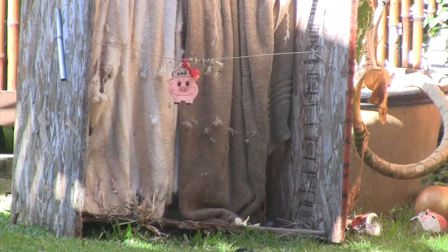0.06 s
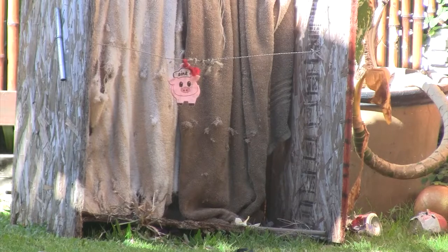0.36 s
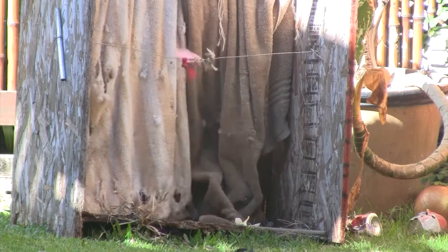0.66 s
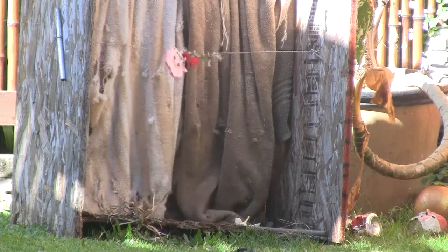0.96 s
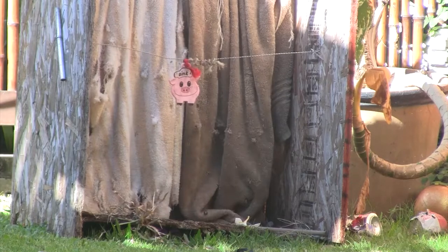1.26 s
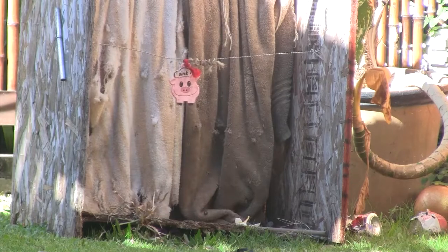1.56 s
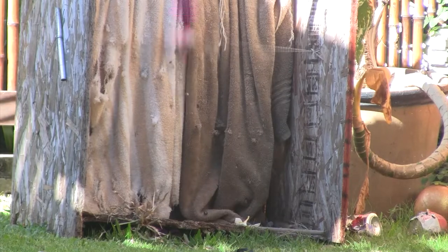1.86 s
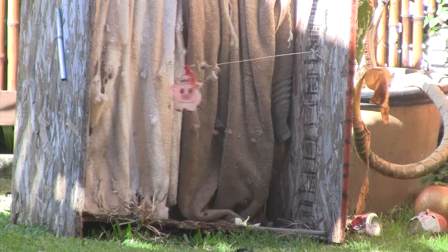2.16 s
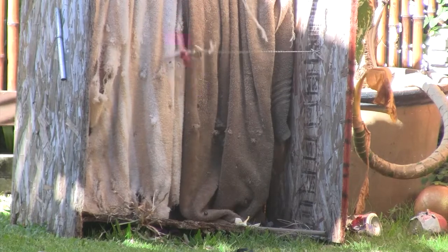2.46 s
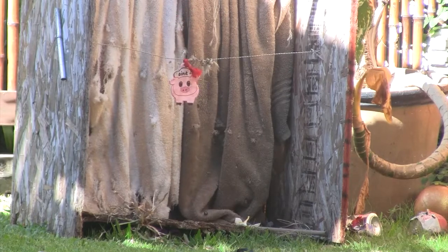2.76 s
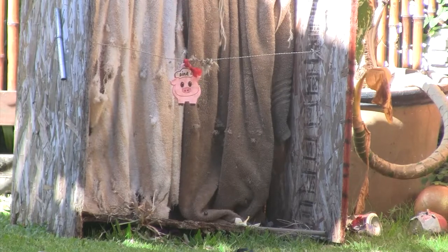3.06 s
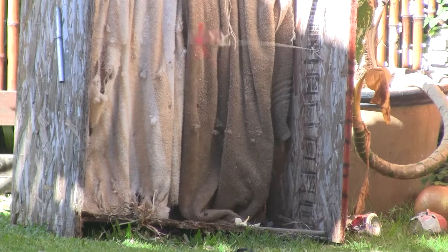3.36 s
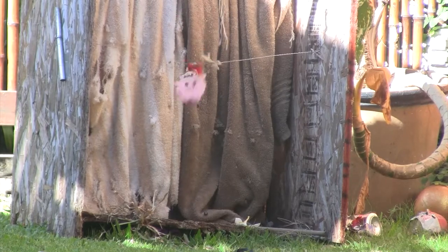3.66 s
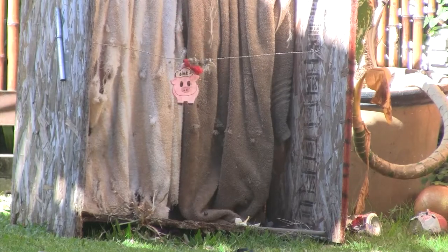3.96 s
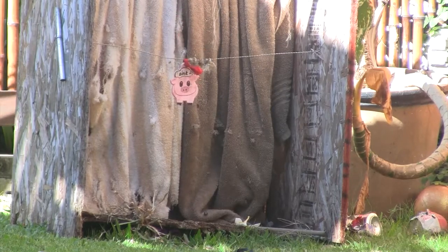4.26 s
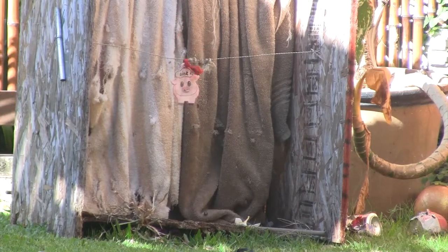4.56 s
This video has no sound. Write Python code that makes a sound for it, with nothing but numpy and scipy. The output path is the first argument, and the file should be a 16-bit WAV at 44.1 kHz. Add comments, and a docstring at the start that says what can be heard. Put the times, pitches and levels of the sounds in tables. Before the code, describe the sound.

Four close slingshot snaps and cracking target hits in a quiet yard, with dull thumps, wooden knocks and one metallic ping.

```python
"""Over outdoor air and a faint hum, slingshot bands snap twice, close by: four shots in a walled yard.
Each time, 0.19 s later, the ball cracks on a small hanging target and thumps into the cloth lining
of a wooden box. A stray ball rings on metal, others bounce on wood. A soft rustle comes between
the shots, and a far low drone swells once and fades."""
import sys
import numpy as np
from scipy import signal
from scipy.fft import rfft, irfft
from scipy.io import wavfile

SR = 44100
rng = np.random.default_rng(int(sys.argv[2]) if len(sys.argv) > 2 else 0)


def master_out(mix):
    """Clip the mix to full scale and print it as 16-bit PCM to the path in sys.argv[1]."""
    frames = np.transpose(np.atleast_2d(mix))
    ceiling = np.clip(frames, -1, 1)
    pcm = np.round(ceiling * 32767).astype(np.int16)
    wavfile.write(sys.argv[1], SR, pcm)


N = 212694
TIME = np.arange(N) / SR


def amp(db):
    return 10 ** (np.asarray(db) / 20)


def unit_rms(x):
    return x / np.sqrt(np.mean(x ** 2) + 1e-20)


def at_hz(table, hz):
    """Table value, interpolated over log frequency."""
    freqs, values = np.transpose(table)
    return np.interp(np.log(hz), np.log(freqs), values)


def click(s, db):
    """Impulse at time s."""
    return amp(db) * (np.arange(N) == round(s * SR))


def convolve(x, response):
    """Signal through a mono or stereo response."""
    return signal.oaconvolve(np.atleast_2d(x), np.atleast_2d(response))[:, :N]


def butter(x, order, hz, kind="low"):
    return signal.sosfilt(signal.butter(order, hz, kind, fs=SR, output="sos"), x + 1e-18)


def echoed(x, echoes, dull_hz=6000):
    """Signal plus early reflections, dulled by rough surfaces."""
    dull = butter(x, 1, dull_hz)
    return x + sum(amp(db) * np.interp(TIME - s, TIME, dull, left=0) for s, db in echoes)


def coloured(x, spectrum, size=2048):
    """Unit-energy minimum-phase filter: a click becomes the shortest pulse with this spectrum."""
    gain = amp(at_hz(spectrum, np.linspace(1, SR / 2, size // 2 + 1)))
    cepstrum = irfft(np.log(gain))
    causal_fold = np.r_[1, np.full(size // 2 - 1, 2), 1, np.zeros(size // 2 - 1)]
    pulse = irfft(np.exp(rfft(cepstrum * causal_fold)))
    return convolve(x, pulse / np.linalg.norm(pulse))[0]


def resonance(x, hz, width_hz):
    """Two-pole resonator, unity peak gain."""
    r = np.exp(-np.pi * width_hz / SR)
    feedback = [1, -2 * r * np.cos(2 * np.pi * hz / SR), r * r]
    return signal.lfilter(np.array([1, 0, -1]) * (1 - r * r) / 2, feedback, x + 1e-18)


def narrow_noise(hz, width_hz):
    """Wavering tone: noise twice through a resonator, 1 s run-in."""
    noise = rng.standard_normal(N + SR)
    return unit_rms(resonance(resonance(noise, hz, width_hz), hz, width_hz)[SR:])


def blow(s, db, hz, width_hz):
    """A few cycles around hz, with the energy of a click at that level."""
    pulse = resonance(resonance(click(s, 0), hz, width_hz), hz, width_hz)
    return amp(db) * pulse / np.linalg.norm(pulse)


# diffuse-field balance: f/Hz, left minus right/dB
BALANCE = [(120, 1), (200, 2), (400, -3), (700, -3), (1300, -1.5), (2400, -0.4), (15000, 0)]
def diffuse_noise(spectrum, width, t60=None, size=N):
    """Unit-rms stereo noise; level, width and optional decay per third octave."""
    edges_hz = np.geomspace(25, 17000, 29)
    white = rng.standard_normal((2, 2, size + SR // 4))
    ears = np.array([[1], [-1]])
    total = 0
    for k, (low, high) in enumerate(zip(edges_hz, edges_hz[1:])):
        mid, side = butter(white[k % 2], 2, [low, high], "band")[:, -size:]
        hz = np.sqrt(low * high)
        side_gain = amp(at_hz(width, hz))
        band = (mid + ears * side_gain * side) / np.hypot(1, side_gain)
        band *= amp(at_hz(spectrum, hz) + ears * at_hz(BALANCE, hz) / 2)
        if t60:
            band *= np.exp(-np.log(1000) * TIME[:size] / at_hz(t60, hz))
        total += band
    return unit_rms(total)


# yard tail decay: f/Hz, T60/s
TAIL_T60 = [(100, 0.58), (400, 0.4), (1200, 0.3532), (3000, 0.4167), (6000, 0.34), (10000, 0.32),
            (15000, 0.12)]
# tail spectrum: f/Hz, level/dB
TAIL_SPECTRUM = [(100, 0), (500, -1), (1500, 2.4), (3000, -3.6), (6000, -1), (10000, -0.1), (15000, -5)]
# tail width: f/Hz, side minus mid/dB
TAIL_WIDTH = [(110, -19), (200, -15), (400, -6.5), (2400, -13), (4400, -5), (8000, -0.5), (15000, 12)]
def yard(x, build_s=0.0012):
    """Fences and walls scatter sound into a short tail."""
    tail = diffuse_noise(TAIL_SPECTRUM, TAIL_WIDTH, TAIL_T60, size=SR // 2)
    tail *= 1 - np.exp(-TIME[:SR // 2] / build_s)
    return convolve(x, tail / np.sqrt(np.sum(tail ** 2) / 2))


# air spectrum: f/Hz, level/dB
AIR_SPECTRUM = [(15, -67), (25, -61), (53, -20.5), (92, -20), (108, -7), (190, -8), (256, -4.5), (394, -7),
                (451, -2.5), (641, -10), (695, -8), (3920, -21.5), (16000, -43.5)]
# air width: f/Hz, side minus mid/dB
AIR_WIDTH = [(60, -20), (110, -13.5), (200, -7), (700, -6.5), (2400, -11.5), (4400, -5.5), (8000, 1.5),
             (15000, 1)]
def outdoors(air_db=-42.5, hum_hz=118.2, hum_db=-55, whirr_db=-55):
    """Steady air; hum and whirr of distant machines."""
    air = amp(air_db) * diffuse_noise(AIR_SPECTRUM, AIR_WIDTH)
    hum = amp(hum_db) * np.sqrt(2) * np.sin(2 * np.pi * hum_hz * TIME)
    whirr = amp(whirr_db) * narrow_noise(hz=443, width_hz=81)
    return air + hum + whirr


# drone swell: t/s, half length/s, peak/dB
SWELL = (0.81, 0.12, -51)
def drone(start_db=-55, fade_db_per_s=3):
    """A far, wavering low tone swells once and fades."""
    s, half_s, peak_db = SWELL
    fade = amp(start_db - fade_db_per_s * TIME)
    swell = amp(peak_db) * np.exp(-((TIME - s) / half_s) ** 2)
    return (fade + swell) * narrow_noise(hz=66.4, width_hz=7.3)


# rustles: t/s, length/s, level/dB, attack/s
RUSTLE_EVENTS = [(0.8, 0.58, -55.5, 0.082), (2.1, .98, -55.5, 0.053), (3.977, 0.405, -45, .002)]
# rustle spectrum: f/Hz, level/dB
RUSTLE_SPECTRUM = [(400, -1), (1200, 6.5), (3000, 2.5), (5000, -1.5), (8000, -10.5), (15000, -33)]
def rustle(scuff_s=0.013, growth_db_per_s=2, release_s=0.18):
    """Soft rustling between shots: scuff, slow growth, release."""
    envelope = 0
    for s, length_s, db, attack_s in RUSTLE_EVENTS:
        age = np.maximum(TIME - s, 0)
        attack = 1 - np.exp(-age / attack_s)
        scuff = 1 + np.exp(-age / scuff_s)
        level = amp(db + growth_db_per_s * np.minimum(age, length_s))
        release = np.exp(-np.maximum(age - length_s, 0) / release_s)
        envelope += level * attack * scuff * release
    return envelope * diffuse_noise(RUSTLE_SPECTRUM, AIR_WIDTH)


# stray ball on metal: t/s, level/dB
STRAY_HIT = (2.4195, -29)
# bar modes: f/Hz, level/dB, T60/s
BAR_MODES = [(3070, -6.5, 0.5), (3100, -13.5, 0.58), (7830, -19, .21), (8020, -5, 0.17), (14100, -17, .1),
             (14550, -6, 0.21)]
def metal_ping(left_db=-3, yard_db=-9):
    """A stray ball rings the widely spaced bending modes of a short bar."""
    s, db = STRAY_HIT
    age = np.maximum(TIME - s, 0)
    ring = 0
    for hz, mode_db, t60_s in BAR_MODES:
        decay = np.exp(-np.log(1000) * age / t60_s)
        ring += amp(db + mode_db) * np.sin(2 * np.pi * hz * age) * decay
    return ring * amp([[left_db], [0]]) + amp(yard_db) * yard(ring)


def bounces(s, db, hz, width_hz, loss_db, gap_s=0.019, gap_ratio=0.92, pitch_ratio=0.748):
    """A blow and three rebounds, each sooner, softer and duller."""
    blows = 0
    for k in range(4):
        dulling = pitch_ratio ** k
        blows += blow(s, db - k * loss_db, hz * dulling, width_hz * dulling)
        s += gap_s * gap_ratio ** k
    return blows


# box reflections: delay/s, level/dB
BOX_REFLECTIONS = [(.0020, -7.5), (.0080, -6)]
# knocks: t/s, level/dB, f/Hz, bandwidth/Hz, yard send/dB, loss per bounce/dB
WOOD_KNOCKS = [(0.4760, -3, 2180, 2500, -19, 22), (2.4240, -17.5, 2500, 3200, 1.5, 3.5),
               (3.3022, -5, 3750, 2200, -10, 14), (3.3064, 3, 1170, 1340, -1, 6),
               (3.3160, 3.5, 438, 600, 3.5, 5.5), (3.3933, 2.5, 2200, 1290, -5, 8),
               (3.7127, -14.5, 3230, 1800, -0.5, 14), (3.7190, -11, 1550, 1000, -2.5, 7)]
def wood_knocks(contact_hz=5000, chatter_s=0.0024, chatter_db=-4):
    """Ball and target knock about the box; the soft contact chatters and cuts the treble."""
    size = SR // 20
    direct, scattered = 0, 0
    for s, db, hz, width_hz, yard_db, loss_db in WOOD_KNOCKS:
        chatter = rng.standard_normal(size) * np.exp(-TIME[:size] / chatter_s)
        contact = amp(chatter_db) * chatter / np.linalg.norm(chatter) + signal.unit_impulse(size)
        knock = convolve(bounces(s, db, hz, width_hz, loss_db), contact / np.linalg.norm(contact))[0]
        direct += knock
        scattered += amp(yard_db) * knock
    return butter(echoed(direct, BOX_REFLECTIONS) + yard(scattered), 2, contact_hz)


# ball into cloth: t/s, level/dB, f/Hz, swell/s
CLOTH_THUMPS = [(0.4758, -7.5, 310, 0.0017), (1.9025, -18.5, 138, 0.0045), (3.306, -6, 158, 0.0041),
                (3.723, -28, 220, 0.0016), (4.638, -16.5, 136, 0.0044)]
# box air modes: f/Hz, bandwidth/Hz, level/dB
CAVITY_MODES = [(97, 4, -25), (120, 3.8, 3), (158, 7.6, -14)]
# wall reflections: delay/s, level/dB
WALL_REFLECTIONS = [(0.0184, -6.5), (0.031, -2.5), (.0480, -10.5)]
def cloth(yard_db=-9, low_cut_hz=85):
    """The jerked cloth pumps a few cycles of air, which ring in the box and echo off the walls."""
    push = 0
    for s, db, hz, swell_s in CLOTH_THUMPS:
        age = np.clip(TIME - s, 0, 20 * swell_s)
        envelope = (age / swell_s * np.exp(1 - age / swell_s)) ** 2
        push -= amp(db) * np.sin(2 * np.pi * hz * age) * envelope
    push = butter(push, 3, low_cut_hz, "high")  # slow motion only slips air around the edges
    boom = sum(amp(db) * resonance(push, hz, width_hz) for hz, width_hz, db in CAVITY_MODES)
    return echoed(push + boom, WALL_REFLECTIONS) + amp(yard_db) * yard(push)


# ball on target: t/s, crack/dB, ring/dB, yard send/dB
TARGET_HITS = [(0.4718, 6, -7.5, -2.5), (1.8936, -2, 17, -4), (3.302, 6, -3.5, 0.5), (4.6280, -11, 18, -5)]
# crack spectrum: f/Hz, level/dB
CRACK_SPECTRUM = [(100, -16), (500, 5), (1500, 0), (2600, 6.5), (4200, 3), (6000, -2), (10000, -7),
                  (15500, -9.5)]
# plate ring spectrum: f/Hz, level/dB
PLATE_SPECTRUM = [(100, -21), (500, -15.5), (1000, -15), (1500, -10), (2300, -4.5), (2750, -3),
                  (3200, -0.5), (3900, -2.5), (5200, -9.5), (8000, -19.5), (12000, -22), (15500, -24)]
def target():
    """The ball cracks on the small plate, which rings a few cycles; the box reflects both."""
    direct, scattered = 0, 0
    for s, crack_db, ring_db, yard_db in TARGET_HITS:
        hit = coloured(click(s, crack_db), CRACK_SPECTRUM) + coloured(click(s, ring_db), PLATE_SPECTRUM)
        direct += hit
        scattered += amp(yard_db) * hit
    return echoed(direct, BOX_REFLECTIONS, dull_hz=4060) + yard(scattered, build_s=0.00092)


# rubber spectrum: f/Hz, level/dB
RUBBER_SPECTRUM = [(60, -15), (150, -16), (400, 0), (1000, -2.5), (1600, -3.5), (2400, 0), (3600, -0.5),
                   (5200, -3), (8000, -5), (12000, -8), (15500, -7.5)]
def rubber_bands(snaps, rise_s=0.0039, flutter_s=0.016, burst_s=0.00098, burst_db=-13,
                 grain_db=4.0, yard_db=22):
    """Each snap is a crack amid tiny slaps of slack rubber. Returns direct sound and yard send."""
    cracks, envelope, scattered = 0, 0, 0
    for s, crack_db, flutter_db in snaps:
        age = TIME - s
        flutter = np.exp(-np.minimum(np.maximum(-age / rise_s, age / flutter_s), 20))
        burst = np.exp(-np.minimum(np.abs(age) / burst_s, 20))
        envelope += amp(flutter_db) * flutter + amp(crack_db + burst_db) * burst
        cracks += click(s, crack_db)
        scattered += click(s, flutter_db + yard_db)
    grains = unit_rms(rng.standard_normal(N) * amp(grain_db * rng.standard_normal(N)))
    return coloured(cracks + envelope * grains, RUBBER_SPECTRUM), coloured(scattered, RUBBER_SPECTRUM)


# shots: t/s, slip/dB, whip/dB, whip flutter/dB, slap/dB, pouch clack/dB, clack f/Hz
SLINGSHOT_SHOTS = [(0.2832, -10, 1, -19, -3, -1, 3380), (1.7040, -16.5, -6, -16, -2, -24, 2880),
                   (3.1150, -4, -4, -17, 0.5, -1, 2300), (4.4397, -11, -4, -16.5, -11, -0.5, 3100)]
# pouch slip spectrum: f/Hz, level/dB
SLIP_SPECTRUM = [(200, -6.5), (800, -1.5), (1800, -0.5), (3500, -9), (7000, -12), (15000, -23)]
# ground reflections: delay/s, level/dB
GROUND_REFLECTIONS = [(.0030, -22.5), (.0067, -10.5)]
def slingshot(slip_lead_s=0.0158, slap_lag_s=0.0244, slap_flutter_db=-22, pouch_yard_db=-5, left_db=-2.5):
    """The pouch slips from the fingers; the bands whip past the fork, then slap back as it clacks."""
    snaps, slips, clacks = [], 0, 0
    for s, slip_db, whip_db, flutter_db, slap_db, clack_db, clack_hz in SLINGSHOT_SHOTS:
        slips += click(s - slip_lead_s, slip_db)
        snaps += [(s, whip_db, flutter_db), (s + slap_lag_s, slap_db, slap_flutter_db)]
        clacks += blow(s + slap_lag_s, clack_db, clack_hz, width_hz=1600)
    bands, scattered = rubber_bands(snaps)
    pouch = clacks + coloured(slips, SLIP_SPECTRUM)
    right = echoed(bands + pouch, GROUND_REFLECTIONS, dull_hz=12000)
    left = amp(left_db) * np.roll(right, 1)  # shooter stands to the right
    return np.array([left, right]) + yard(scattered + amp(pouch_yard_db) * pouch)


def scene():
    """Stereo sum of all sources."""
    return slingshot() + target() + cloth() + wood_knocks() + metal_ping() + rustle() + outdoors() + drone()


def record(dry, low_cut_hz=38, top_cut_hz=16200):
    """The hardest cracks clip; deep bass and top are cut."""
    top_cut = signal.ellip(10, .1, 80, top_cut_hz, fs=SR, output="sos")
    clipped = np.clip(signal.sosfilt(top_cut, dry), -1, 1)
    return signal.sosfilt(top_cut, butter(clipped, 2, low_cut_hz, "high"))


dry = scene()
out = record(dry)
master_out(out)
```